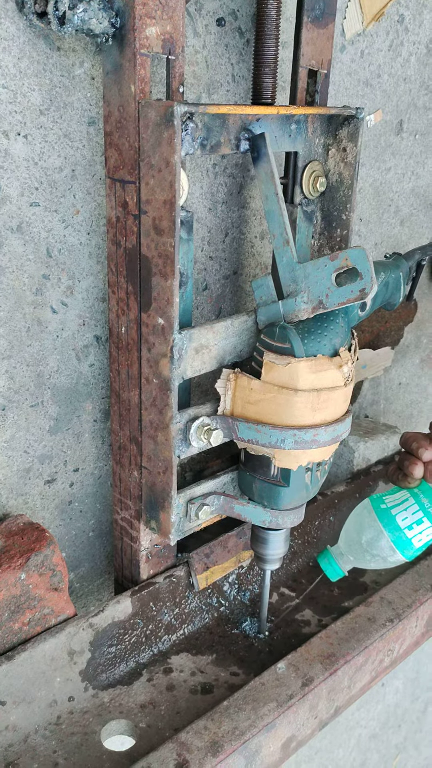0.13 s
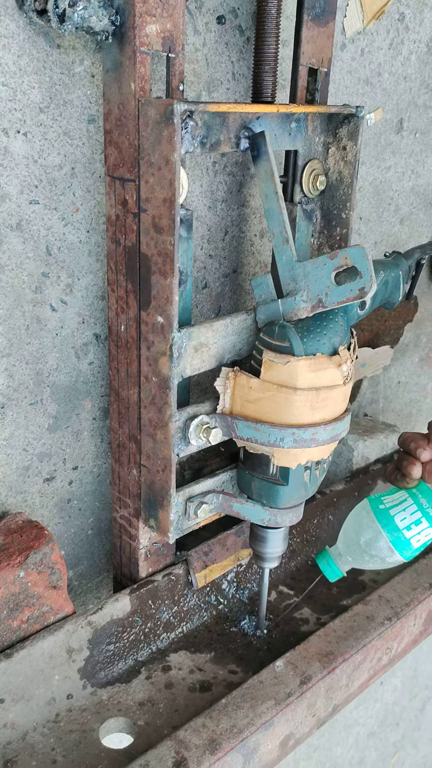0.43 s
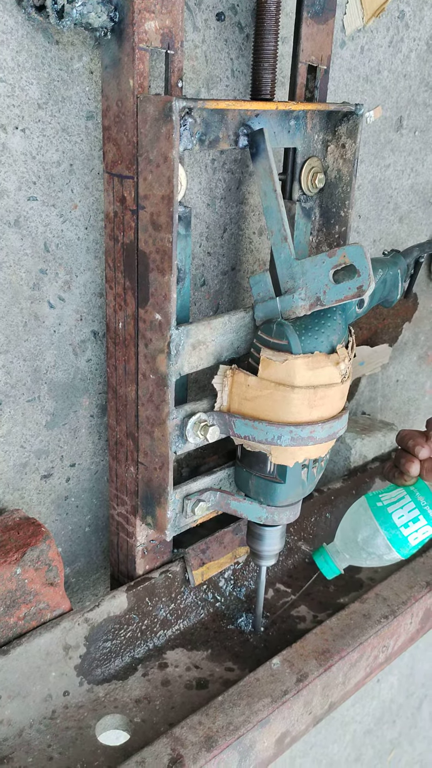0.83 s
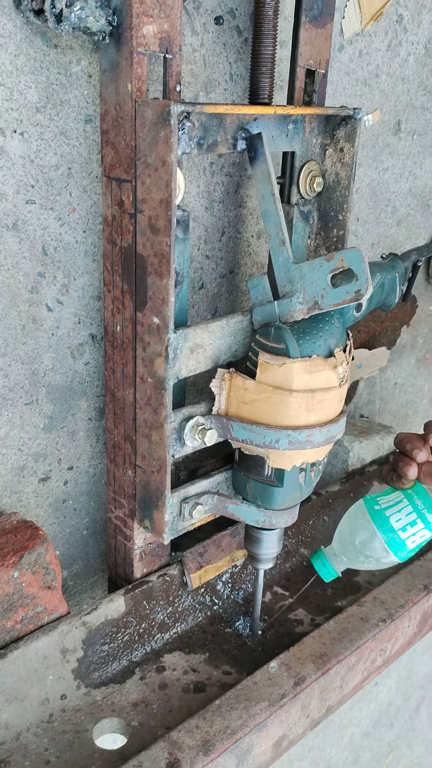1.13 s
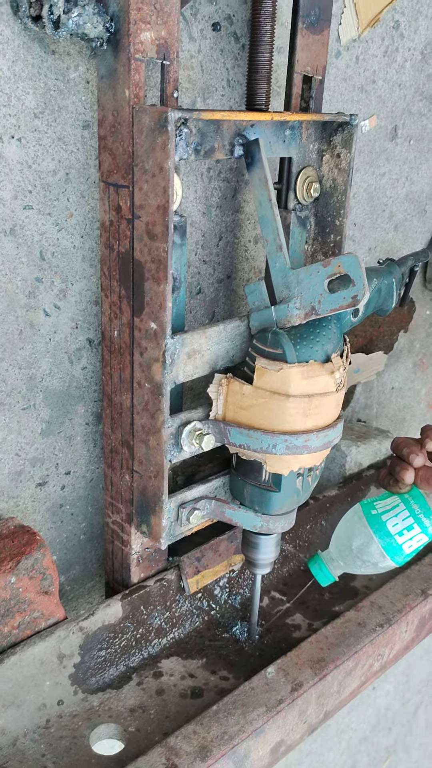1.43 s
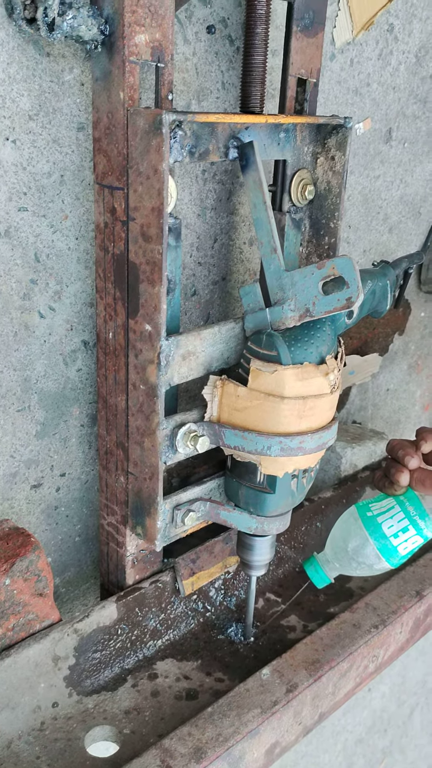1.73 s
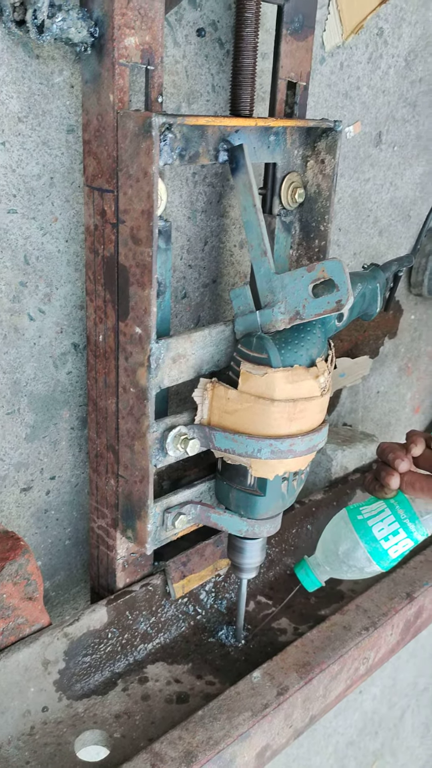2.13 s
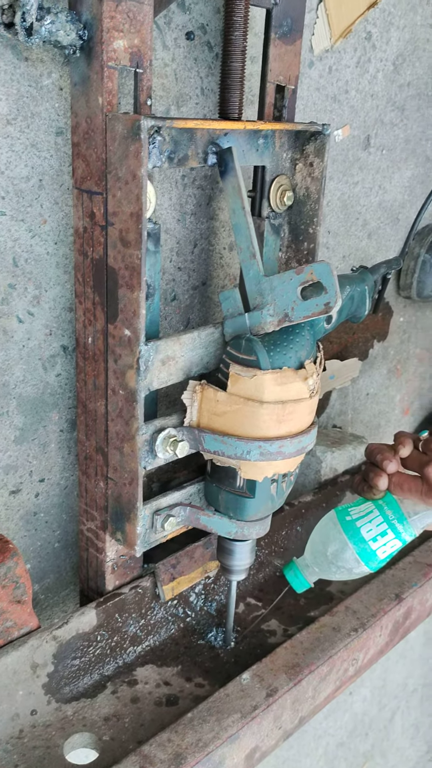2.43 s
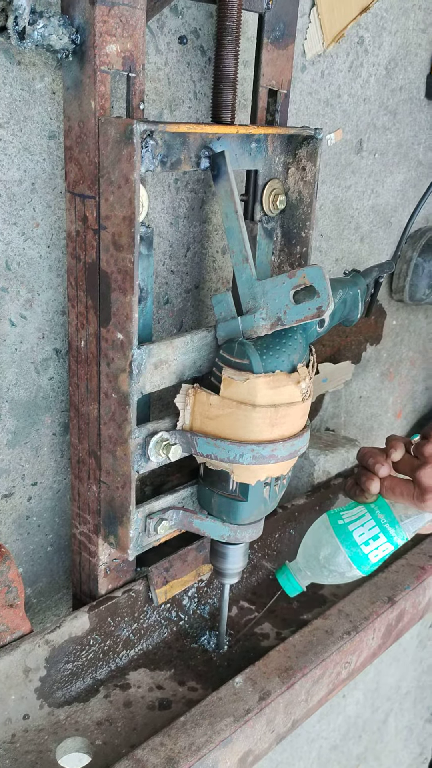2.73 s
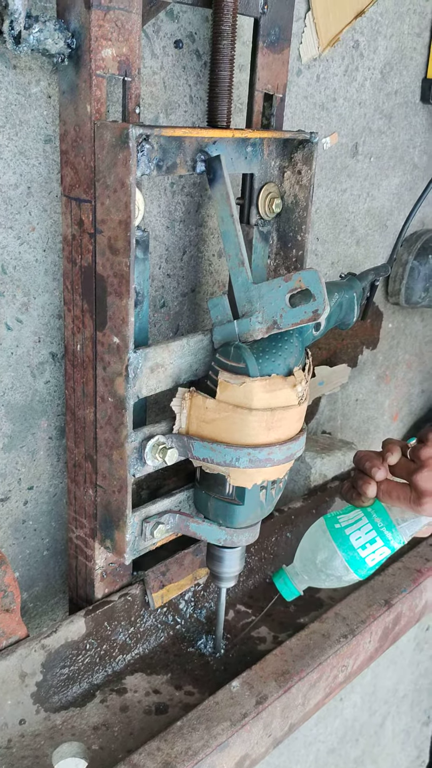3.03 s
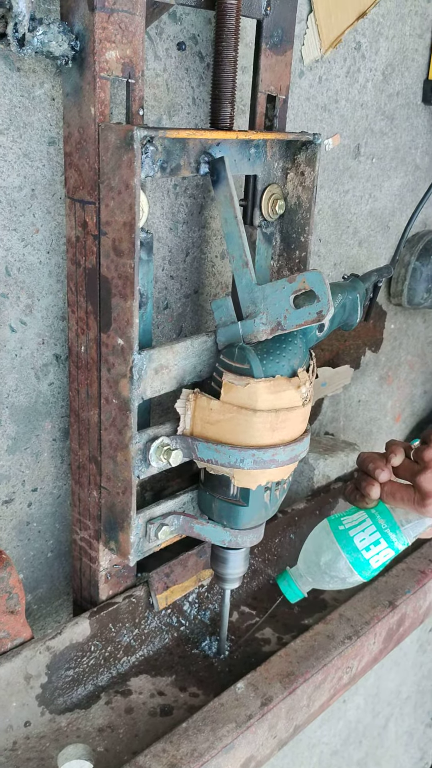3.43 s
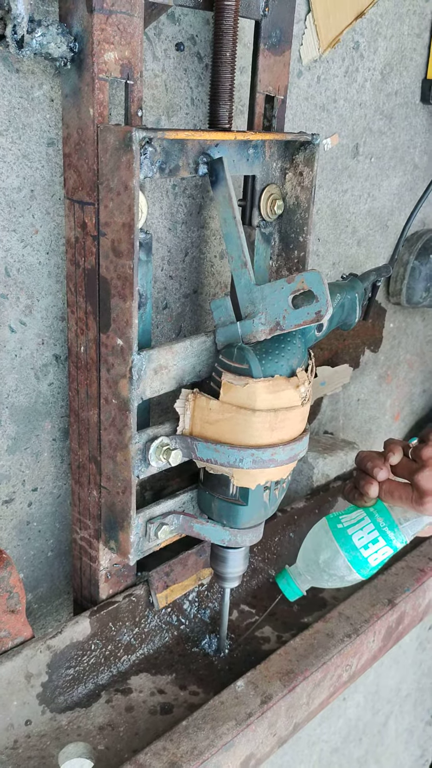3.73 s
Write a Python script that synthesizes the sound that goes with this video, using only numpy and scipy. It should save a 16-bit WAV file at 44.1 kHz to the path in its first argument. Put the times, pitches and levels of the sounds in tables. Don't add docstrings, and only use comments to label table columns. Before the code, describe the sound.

An electric drill clamped in a steel jig runs without pause, loud and close. Its piercing gear whine, around 1.5 kHz with a strong octave, climbs until about 1.2 s, sags to 2.2 s, climbs again to 3.2 s, then eases slightly until the end near 4 s. Rough cutting hiss swells around 0.2 and 2.25 s. Metallic rattle and fan roar continue; faint wind rumbles right, 0.3-1.3 s.

```python
import sys
import numpy as np
from scipy import signal
from scipy.io import wavfile
from scipy.ndimage import uniform_filter1d

SR = 44100
rng = np.random.default_rng(int(sys.argv[2]) if len(sys.argv) > 2 else 0)


def log_audio(samples):
    frames = np.atleast_2d(samples).T
    limited = np.clip(frames, -1, 1)
    pcm = np.round(limited * 32767).astype(np.int16)
    wavfile.write(sys.argv[1], SR, pcm)


def level_to_linear(level):
    exponent = np.asarray(level, float) / 20
    return 10 ** exponent


N = 171990
STEP = 32
PINION, GEAR = 4, 42


def evened(x):
    return x / np.sqrt(np.mean(x ** 2) + 1e-20)


def read(points, hz):
    f, value = np.transpose(points)
    return np.interp(np.log(hz + 1), np.log(f + 1), value)


def curve(table, column, t):
    rows = np.array(table)
    return np.interp(t, rows[:, 0], rows[:, column])


def smooth(table, column, t):
    return uniform_filter1d(curve(table, column, t), int(0.04 / t[1]))


def drift(rate_hz, t):
    f = np.geomspace(rate_hz / 8, rate_hz, num=10)[:, None]
    sines = np.sin(2 * np.pi * (f * t + rng.random(f.shape)))
    return evened((sines / np.sqrt(f)).sum(0))


# t/s, shaft f/Hz, mesh level/dB left, right,
# second mesh harmonic level/dB left, right
MOTOR = [(0.0, 368.7, -23, -32, -23, -19.5), (0.122, 375.3, -20.5, -19, -15, -17),
         (0.244, 383.4, -15.5, -20.5, -20, -18), (0.366, 389.4, -12.5, -16, -19, -18.8),
         (0.488, 395.7, -18, -17, -34.9, -22), (0.609, 400.3, -14, -16.5, -30, -23),
         (0.731, 404.6, -16.5, -16.5, -27, -27.5), (0.853, 407, -16.0, -18.3, -25, -23.5),
         (0.975, 409.4, -18.5, -21.5, -31, -24), (1.097, 412.8, -20.5, -20.5, -43, -27),
         (1.219, 413.5, -18.5, -25.5, -33, -25), (1.341, 407.8, -17.5, -18, -27.6, -20.5),
         (1.462, 398.3, -16, -15.5, -25, -26), (1.584, 390, -14.0, -17.5, -18.5, -19.5),
         (1.706, 387.4, -14.3, -16.5, -27, -21), (1.828, 382, -15.1, -20.3, -24, -20),
         (1.95, 381, -14.5, -18, -22.9, -22.5), (2.072, 380.0, -18, -19, -22.5, -32),
         (2.194, 379, -18, -15.5, -15.6, -27), (2.316, 379.8, -17.6, -18, -15, -18),
         (2.438, 387, -14, -19.3, -17, -15.5), (2.559, 392.8, -14, -16, -23, -19),
         (2.681, 395.5, -13.5, -17.5, -20.5, -19), (2.803, 401.6, -17.5, -18, -36, -22.5),
         (2.925, 405.6, -19, -16.9, -30.7, -25), (3.047, 408, -17, -18, -24, -29.7),
         (3.169, 410.4, -18.8, -18.0, -24.7, -26), (3.291, 410.0, -18.5, -19.5, -27, -22.1),
         (3.412, 407.1, -16, -19.5, -27.5, -23.2), (3.534, 400.2, -14.5, -18, -27.5, -34),
         (3.656, 395.9, -12, -18.8, -28.7, -27.7), (3.778, 391.9, -15, -19.1, -27, -23.6),
         (3.9, 393.6, -11.5, -17, -28, -27)]


def shaft_angle(t):
    hz = smooth(MOTOR, 1, t) + 0.399 * drift(9, t)
    return 2 * np.pi * np.cumsum(np.interp(np.arange(N) / SR, t, hz)) / SR


# t/s, left lead/rad in the mesh, left lead/rad in its octave, order 10 level/dB,
# order 12 level/dB, cutting effort/dB, order 6 level/dB
LOAD = [(0.0, 1.0, 2.2, -33, -29, 0.5, -34), (0.15, 1.5, 2.5, -22.5, -35.81, 7.5, -30),
        (0.3, 1.47, 4.5, -37.17, -32.5, 5.5, -35.1), (0.45, 1.91, 3.5, -43, -32, 2.5, -43),
        (0.6, 2.56, 1, -42.24, -41, -0.5, -37), (0.75, 2.67, 1.8, -42.15, -38, -0.8, -39),
        (0.9, 2.51, 0.8, -47.52, -34.63, 2, -42.87), (1.05, 2.63, -2, -56.39, -34, 1.5, -35),
        (1.2, 2.81, -0.06, -48.18, -39.26, -1.5, -37), (1.35, 2.77, -0.8, -39.74, -32, -2, -39),
        (1.5, 2.18, -3, -35.4, -28.5, -0.5, -33), (1.65, 2.03, -3.22, -33.23, -30, 0.52, -33),
        (1.8, 1.88, -5.5, -32, -32, -0.3, -32), (1.95, 2, -6, -38, -37.14, 0.49, -31.06),
        (2.1, 2.1, -6.5, -38, -36, 1.5, -28.5), (2.25, 1.65, -3.5, -35.21, -34, 7, -35),
        (2.4, 1.55, -1.1, -34.95, -32, 3.5, -38), (2.55, 1.86, -1.07, -39.97, -33, 0, -34.31),
        (2.7, 2.35, -0.7, -42.75, -33, -0.5, -39), (2.85, 2.04, -5, -47.86, -40, 0.3, -36),
        (3.0, 2.54, -4.5, -48.66, -37, -0.1, -33), (3.15, 2.55, -1.6, -45.98, -33, -0.5, -31),
        (3.3, 3, -1.1, -57.28, -37, -0.7, -36.5), (3.45, 2.7, -0.84, -40.89, -32, -0.7, -34),
        (3.6, 2.05, 0.13, -41, -30.29, -0.7, -47), (3.75, 2.37, 0.2, -37, -29.5, -1.2, -41),
        (3.9, 2.2, 0.4, -36.13, -27, -1, -40.2)]


def effort_db(t):
    return curve(LOAD, 5, t)


# f/Hz, width/Hz, level/dB
CASE = [(162, 23, 5.5), (732, 210, 4), (1060, 51, 2.5), (1590, 280, 8.5), (1958, 94, 8), (2300, 370, 7.5),
        (3130, 163, 9), (3816, 96, 7.5), (4840, 150, 6.5), (5355, 170, 8.5), (7840, 1130, 9),
        (13700, 1060, 10)]
# f/Hz, width/Hz, level/dB
BEAM = [(5660, 50, 6), (5850, 50, 5), (6020, 40, 15), (6260, 60, 14), (6470, 48, 6), (6650, 40, 5),
        (6845, 50, 8)]
# f/Hz, width/Hz, share of power
DIPS = [(3610, 110, .8), (5545, 50, .7), (5770, 60, .8), (5930, 40, .7), (6140, 90, .97), (6365, 70, .93),
        (6555, 70, .9), (6750, 60, .7), (6960, 90, .6)]


def case_db(hz):
    modes = sum((level_to_linear(db) ** 2 - 1) / (1 + (2 * (hz - f) / width) ** 2) for f, width, db in CASE + BEAM)
    passed = [1 - lost / (1 + (2 * (hz - f) / width) ** 4) for f, width, lost in DIPS]
    return 10 * np.log10((1 + modes.clip(0)) * np.prod(passed, axis=0))


def tone(phase, left_db, right_db, gap, wander):
    ports = np.array([level_to_linear(left_db) * np.exp(1j * gap), level_to_linear(right_db)])
    slow = np.sqrt(2) * np.exp(1j * wander) * ports
    carrier = np.exp(1j * phase)
    at = np.arange(N) / STEP
    return np.array([(np.interp(at, np.arange(len(s)), s) * carrier).real for s in slow])


RUNOUT = [(1, 0.2, 0.069), (3, 0.063, 0.01), (4, 0.085, 0.033)]
# start t/s, end t/s
FREE = [
    (.83, 1.41),
    (3.06, 3.52),
]


def mesh(t, turn):
    gear = turn * PINION / GEAR
    swing = sum(rad * np.sin(k * gear + k) for k, rad, _ in RUNOUT)
    level = sum(share * np.cos(k * gear + k) for k, _, share in RUNOUT)
    left_db, right_db, left2_db, right2_db = [smooth(MOTOR, k, t) for k in range(2, 6)]
    lead, lead2, tenth_db, third_db, _, sixth_db = [smooth(LOAD, k, t) for k in range(1, 7)]

    snap_s, octave_db = 0.012, 3
    free = sum(np.clip((t - a) / snap_s, 0, 1) - np.clip((t - b) / snap_s, 0, 1) for a, b in FREE) - 0.5
    left2_db = left2_db + free * octave_db + 0.5
    right2_db = right2_db + free * octave_db + 0.5
    scatter = 0.074 * drift(250, t)

    first = tone(PINION * turn + swing, left_db + 0.63 * drift(30, t), right_db + 0.34 * drift(30, t),
                 lead + 0.22 * free + 0.093 * drift(12, t), scatter)
    second = tone(2 * PINION * turn + swing, left2_db + 1.2 * drift(30, t),
                  right2_db + 1.2 * drift(30, t), lead2 + drift(9.1, t) / 5, 0.85 * scatter)
    third = tone(3 * PINION * turn + 2.5 * swing, third_db - 0.5 + 1.2 * drift(9, t),
                 third_db + 5.0 + 1.3 * drift(30, t), 1.9 + 0.35 * drift(5.13, t), 1.8 * scatter)
    tenth = tone(10 * turn + 2.3 * swing, tenth_db - 0.4 + 1.9 * drift(20, t),
                 tenth_db + 1.3 + 1.9 * drift(20, t), 0.6 + 0.6 * drift(5.1, t), 3.6 * scatter)
    sixth = tone(3 * PINION * turn / 2 + 1.2 * swing, sixth_db + 0.4 + 2.7 * drift(14, t),
                 sixth_db - 1.5 + 3.5 * drift(14, t), 0.1 + 0.24 * drift(6, t), 2.1 * scatter)
    return first * (1 - level) + second * (1 - 3.3 * level) + third + tenth + sixth


SHAFT_ORDERS = [1, 2, 3, 5, 7, 9, 14, 16, 18, 20, 24]
# level/dB left, level/dB right, left lead/rad, share of effort/1
ORDERS_DB = [(-48, -48.5, -0.42, 0), (-45.5, -50, -0.82, 0.52), (-49.5, -46, -0.88, 0),
             (-39, -41.5, 0.013, .3), (-51, -44, 1.3, 0), (-37, -37, 0.44, 0.15), (-50, -38, .3, .3),
             (-47.5, -48.5, -0.88, 0.94), (-57, -53, -.8, .3), (-43, -52, -1.3, .3), (-47, -52, .9, 0)]
BEATS = [(0, 1), (1, -1), (1, 1), (2, 1), (3, -1)]
# level/dB left, level/dB right, left lead/rad
BEATS_DB = [(-53.5, -58, -.2), (-49, -51.5, -0.59), (-42.5, -37.5, .5), (-37, -33, 0.64), (-41, -46, 1.5)]


def orders(t, hz, turn):
    second_pair, blades, fan_db = 16, 39, -46
    rows = [(k, *row) for k, row in zip(SHAFT_ORDERS, ORDERS_DB)]
    for (multiple, sign), row in zip(BEATS, BEATS_DB):
        rows.append((PINION * (multiple + sign * second_pair / GEAR), *row, 0.3))
    out = np.zeros((2, N))
    effort = effort_db(t)
    for k, left_db, right_db, gap, share in rows:
        ring_db = case_db(k * hz)
        loose = np.clip(k / 3.9, 0, 1)
        db = share * effort + 0.46 * (ring_db - ring_db.mean()) + 1.66 * loose * drift(25, t)
        out += tone(k * turn, left_db + db + 2.5 * loose * drift(6.5, t),
                    right_db + db + 1.9 * loose * drift(5.5, t),
                    gap + 0.5 * drift(4.07, t), 0.4 * loose * drift(30, t))
    wobble = 1.5 * np.sin(turn * 0.05)
    whistle = tone(blades * turn + wobble, fan_db + drift(10, t), fan_db + drift(10, t), 2.1, drift(40, t))
    return out + whistle


# f/Hz, level/dB per Hz
ROAR = [(25, -33), (130, -10.5), (320, -16.5), (1400, -11.5), (4500, -3.5), (6800, -21), (9500, -10),
        (15000, -37.5)]
# f/Hz, slope/dB per dB
LOAD_SHARE = [(1000, 0), (2500, 0.6), (4500, 0.5), (6100, 1.21), (8000, 0.28)]
# f/Hz, left minus right level/dB
PAN = [(60, -4), (110, -0.5), (200, 1.5), (380, -7), (700, -1.5), (1290, -4.5), (2380, 0.5), (4400, -7),
       (8120, 5.5), (15000, -0.5)]


def colour(z, hz, t):
    db = read(ROAR, hz) + case_db(hz)
    pan_db = read(PAN, hz) / 2 * np.array([[1], [-1]])
    load_db = read(LOAD_SHARE, hz)[:, None] * effort_db(t)
    z = z * level_to_linear((db + pan_db)[:, :, None] + load_db)
    return evened(signal.istft(z, nperseg=2048, noverlap=1536)[1][:, :N])


# f/Hz, likeness/1
SAME = [(60, 0.64), (130, 1), (290, 0.31), (640, 1), (1410, 0.028), (3100, 0.51), (6820, -0.15),
        (15000, -0.053)]
# f/Hz, level swing/dB
PATCHY = [(5000, 1.7), (6600, 6.5), (8200, 1.7), (11000, 5)]


def roar():
    frames, hz = N // 512 + 5, np.fft.rfftfreq(2048, 1 / SR)
    a, b, c, d, patches = rng.standard_normal((frames, 1025, 5)).T
    patches = uniform_filter1d(patches, size=10, axis=0)
    patches = evened(uniform_filter1d(patches, size=6, axis=1))
    same = np.clip(read(SAME, hz), -1, 1)[:, None]
    left = a + 1j * b
    right = same * left + np.sqrt(1 - same ** 2) * (c + 1j * d)
    z = np.array([left, right]) * level_to_linear(read(PATCHY, hz)[:, None] * patches)
    return level_to_linear(-21.5) * colour(z, hz, (np.arange(frames) - 2) * 512 / SR)


def rattle(turn):
    pattern = rng.standard_normal((2, 1024))
    pattern[1] = 0.5 * pattern[0] + 0.78 * pattern[1]
    at = turn * PINION / GEAR / (2 * np.pi) % 1 * 1024
    x = [np.interp(at, np.arange(1024), p, period=1024) for p in pattern]
    hz, t, z = signal.stft(x, SR, nperseg=2048, noverlap=1536)
    return level_to_linear(-27) * colour(z, hz, t)


def wind(t):
    start_s, length_s, centre_hz = 0.29, 1.059, 131.07
    low = signal.butter(2, [centre_hz * 0.67, centre_hz * 1.47], "band", fs=SR)
    puffs = evened(signal.lfilter(*low, rng.standard_normal((2, N))))
    swell = np.sin(np.pi * np.clip((t - start_s) / length_s, 0, 1)) ** 0.3
    gust = swell * level_to_linear(-39 + 2.4 * drift(44.9, t))
    return puffs * np.repeat(gust, STEP)[:N] * level_to_linear(np.array([[-9], [0]]))


def scene():
    t = np.arange(N // STEP + 2) * STEP / SR
    turn = shaft_angle(t)
    hz = np.gradient(turn)[np.minimum(np.arange(len(t)) * STEP, N - 1)] * SR / (2 * np.pi)
    return mesh(t, turn) + orders(t, hz, turn) + roar() + rattle(turn) + wind(t)


def band_limit(x):
    return signal.sosfilt(signal.butter(12, 15510, fs=SR, output="sos"), x)


def record(dry):
    edge = signal.firwin(511, 15600, window=("kaiser", 9), fs=SR)[None]
    mix = signal.oaconvolve(dry, edge, "same")
    return band_limit(mix)


dry = scene()
out = record(dry)
log_audio(out)
```